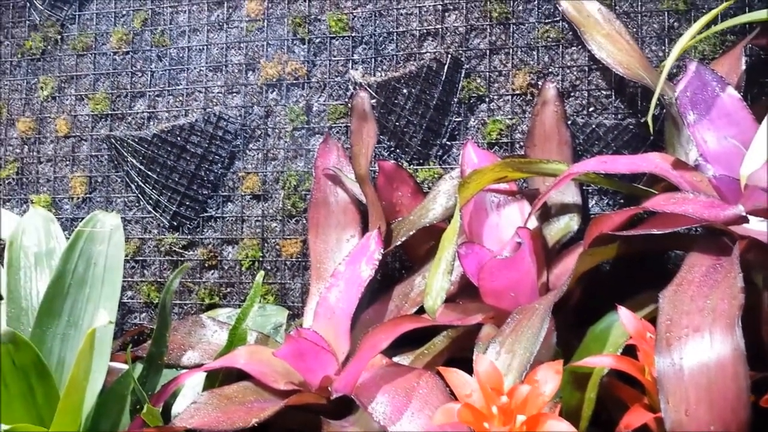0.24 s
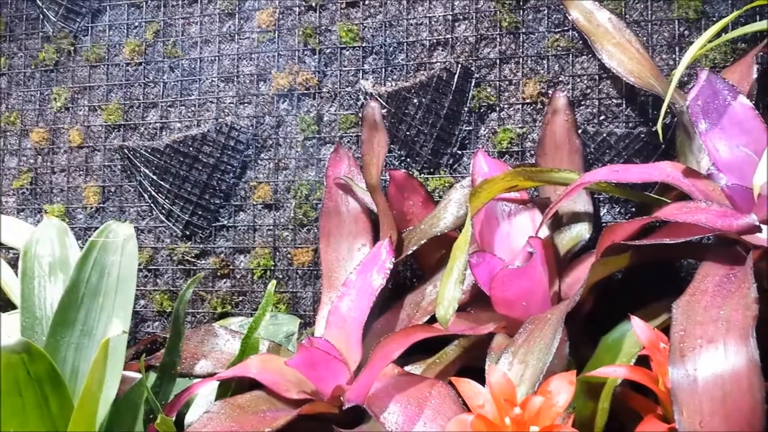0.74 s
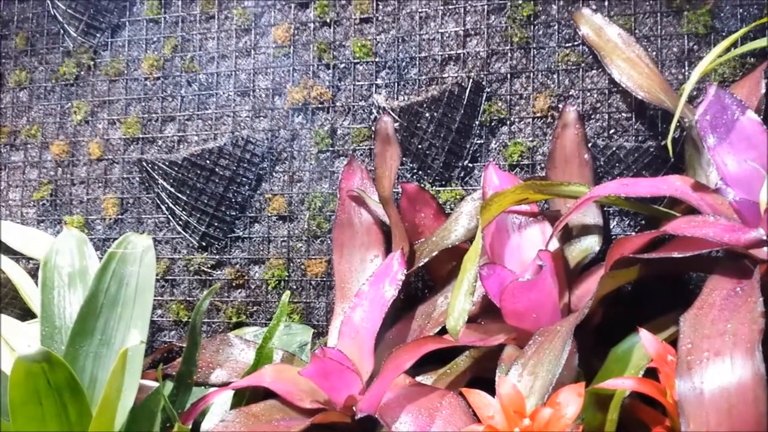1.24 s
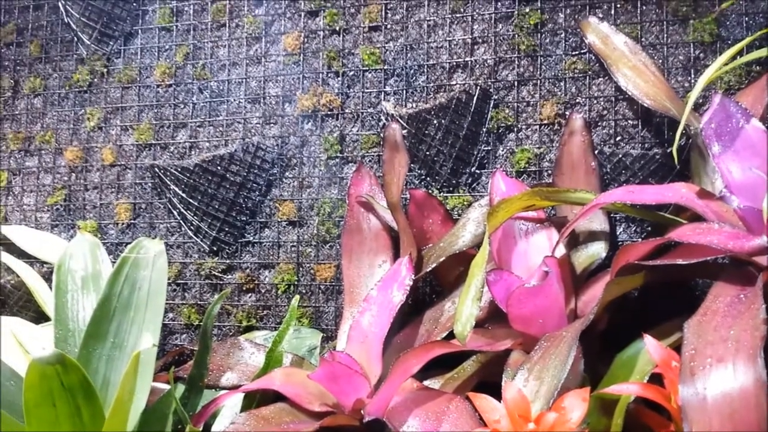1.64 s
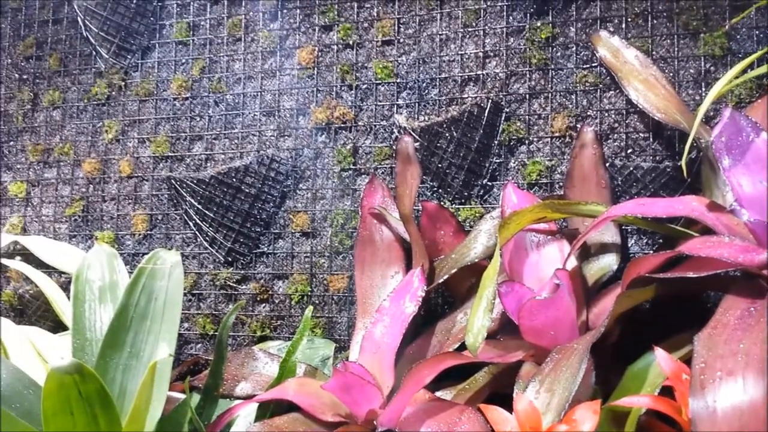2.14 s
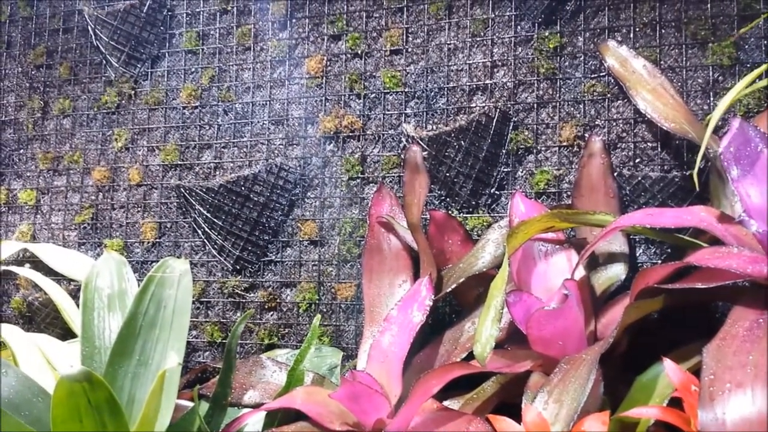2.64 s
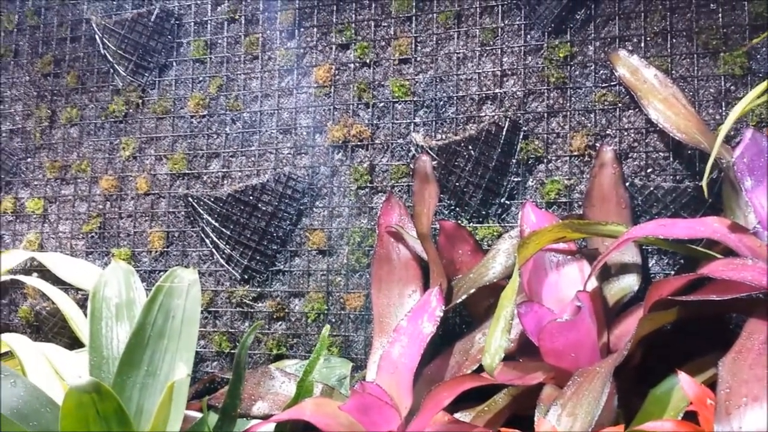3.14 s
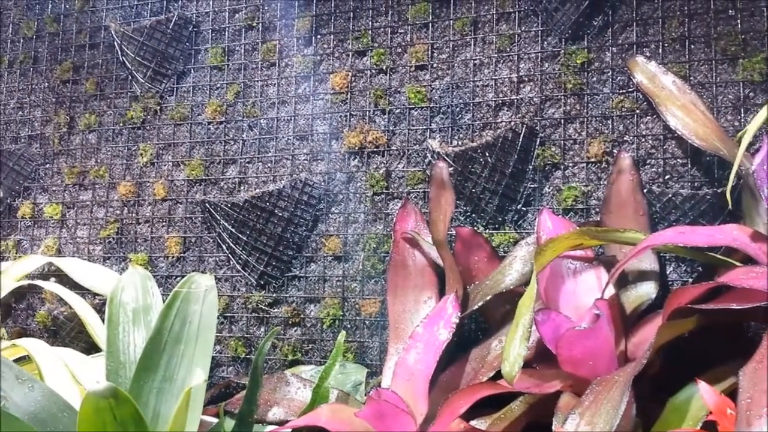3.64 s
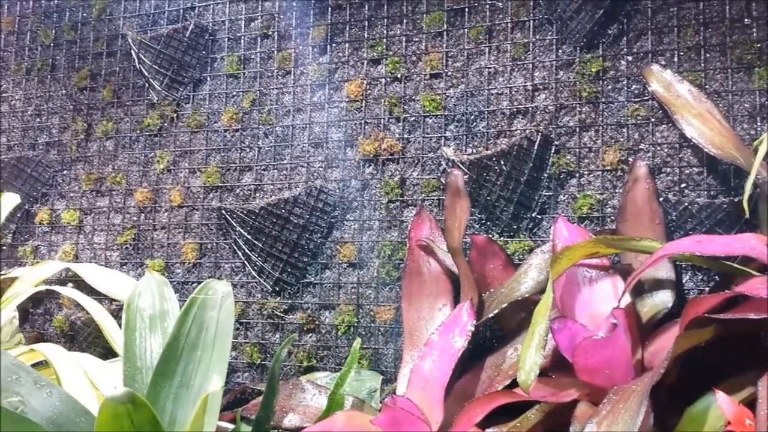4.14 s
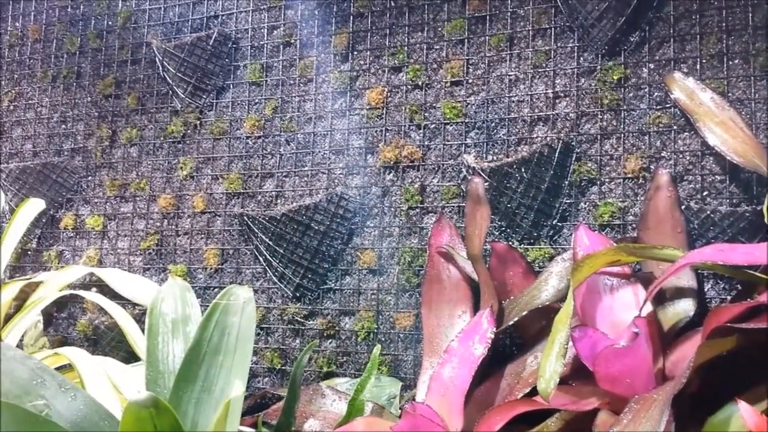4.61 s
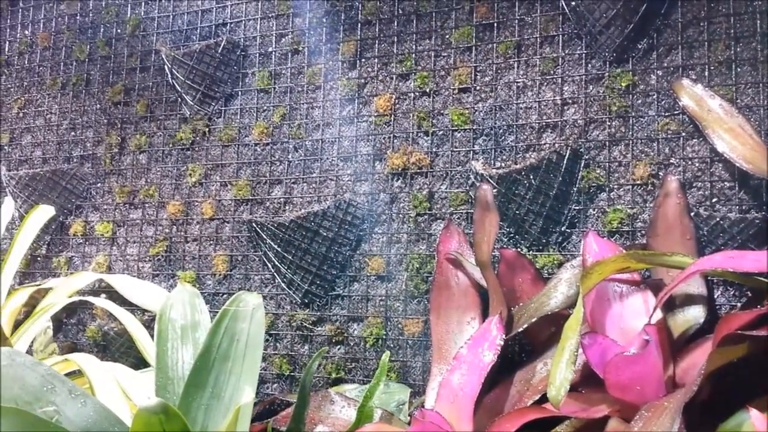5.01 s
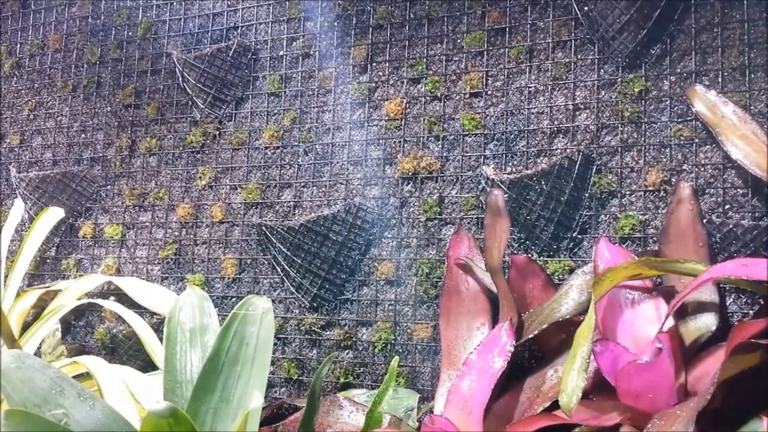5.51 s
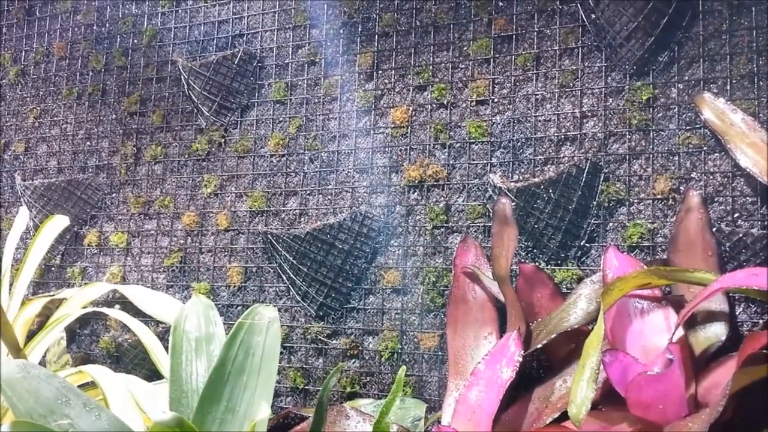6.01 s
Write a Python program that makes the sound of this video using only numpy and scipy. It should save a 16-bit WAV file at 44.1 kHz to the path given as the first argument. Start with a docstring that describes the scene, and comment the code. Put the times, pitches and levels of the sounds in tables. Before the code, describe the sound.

Continuous fine water spray, a wide stereo hiss with barely perceptible flutter, dominates from start to end. Quieter below are a deep steady machine hum, leaning slightly left, and a soft airy breath of ventilation that gently comes and goes. A faint piercing whine wavers separately left and right. Close indoor hand-held pickup, no distinct events.

```python
"""Misting nozzles hiss steadily over a plant wall indoors, heard by a hand-held pair of microphones:
noise coloured per port, with faint drifting patches and a treble flutter.
A thin electrical whine, one sine, swells and fades in each ear as the microphones drift through
its standing waves. A pump and fans hum below: mains tones, shaft tones, a rumble that the room
colours, and a soft airy band of noise that comes and goes."""
import sys
import numpy as np
from scipy import signal
from scipy.fft import rfft, irfft
from scipy.io import wavfile
from scipy.ndimage import uniform_filter1d

SR = 44100
rng = np.random.default_rng(int(sys.argv[2]) if len(sys.argv) > 2 else 0)


def convert_level_to_amplitude(level_db):
    """Map a level in decibels to its linear amplitude factor."""
    exponent = np.asarray(level_db, float) / 20
    return 10 ** exponent


def file_out(sig):
    """Save sig as 16-bit WAV at sys.argv[1]."""
    # one column per channel
    cols = np.atleast_2d(sig).T
    # limit, then scale
    lim = np.clip(cols, -1, 1)
    pcm = np.round(lim * 32767).astype(np.int16)
    wavfile.write(sys.argv[1], SR, pcm)


N = 276058


def evened(x):
    """Scales to rms 1."""
    return x / np.sqrt(np.mean(x ** 2) + 1e-20)


def read(points, hz):
    """Interpolates a table on a log-frequency axis."""
    point_hz, value = np.transpose(points)
    return np.interp(np.log(hz + 1), np.log(point_hz + 1), value)


def wander(top_hz, count):
    """Slow random drift, Gaussian low-pass, overall rms 1; count rows."""
    spectrum = rfft(rng.standard_normal((count, N)))
    spectrum *= np.exp(-(np.fft.rfftfreq(N, 1 / SR) / top_hz) ** 2)
    return evened(irfft(spectrum, N))


# Left-right correlation of the sound field: (frequency [Hz], correlation [-1..1])
LIKENESS = [(60, 0.81), (92, 0.88), (140, 0.86), (210, 0.87), (330, 0.76), (500, 0.48), (770, 0.42),
            (1170, 0.077), (1790, -0.25), (2740, -0.035), (4190, -0.031), (6410, 0.026), (9810, -0.062),
            (15000, 0.0077)]


def paired(z, hz):
    """Mixes four real random arrays into two complex spectra, correlated as the sound field is."""
    same = np.clip(read(LIKENESS, hz), -1, 1)
    same = same.reshape((-1,) + (1,) * (z.ndim - 2))
    left = z[0] + 1j * z[1]
    other = z[2] + 1j * z[3]
    right = same * left + np.sqrt(1 - same ** 2) * other
    return np.array([left, right])


# Broad machine rumble, before the lean: (frequency [Hz], density [dB per Hz])
RUMBLE_DENSITY = [(10, -91), (35, -86), (50, -74), (100, -75), (165, -79.5), (230, -78.5), (330, -82.5),
                  (450, -87), (700, -110)]
# Fuzzy bands added to it, before the lean: (centre [Hz], width [Hz], level [dB rms])
RUMBLE_BANDS = [(57.5, 3.9, -62), (85, 14, -68), (146.5, 6.6, -57), (198, 11, -65.5), (251, 12, -66),
                (295.4, 7.6, -64.5)]


def rumble():
    """Air and casing noise of the machines, with narrow bands where ducts and room ring."""
    hz = np.fft.rfftfreq(N, 1 / SR)
    power = convert_level_to_amplitude(read(RUMBLE_DENSITY, hz)) ** 2
    for centre_hz, width_hz, db in RUMBLE_BANDS:
        bell = np.exp(-2 * ((hz - centre_hz) / width_hz) ** 2)
        bell_area_hz = width_hz * np.sqrt(np.pi / 2)
        power = power + convert_level_to_amplitude(db) ** 2 * bell / bell_area_hz
    z = paired(rng.standard_normal((4, len(hz))), hz)
    return irfft(z * np.sqrt(power * N * SR / 4), N)


# Soft airy band, before the lean: (time [s], level [dB rms])
MOAN_LEVEL = [(0, -61), (1.4, -65), (1.85, -59), (2.9, -68), (3.5, -62), (3.8, -64.5), (5.2, -59),
              (6.26, -61.5)]


def moan(centre_hz=788.5, half_width_hz=47):
    """Noise in one broad resonance, swelling slowly."""
    hz = np.fft.rfftfreq(N, 1 / SR)
    z = paired(rng.standard_normal((4, len(hz))), hz)
    shape = np.exp(-((hz - centre_hz) / half_width_hz) ** 4)
    band = evened(irfft(z * shape, N))
    level_db = np.interp(np.arange(N) / SR, *np.transpose(MOAN_LEVEL))
    return band * convert_level_to_amplitude(level_db)


# Mains hum near 120, 240 and 840 Hz, shaft tones at the rest; before waver and lean:
# (frequency [Hz], level [dB rms])
HUM_TONES = [(18.4, -72), (59.3, -61), (62, -63), (91.1, -67), (120, -53.3), (183.2, -65), (207, -65),
             (211.1, -65), (240, -59), (294, -69), (840.1, -76)]


def tones(waver_db=1.0, slip_rad=0.11):
    """Steady sines whose level and phase waver a little."""
    hz, db = np.transpose(HUM_TONES)[:, :, None]
    turns = hz * np.arange(N) / SR + rng.random((len(hz), 1))
    drift = wander(1.8, count=2 * len(HUM_TONES))
    phase = 2 * np.pi * turns + slip_rad * drift[::2]
    level = convert_level_to_amplitude(db + waver_db * drift[1::2])
    return np.sqrt(2) * (level * np.sin(phase)).sum(axis=0)


# Whine in each ear as the microphones drift: (time [s], left level [dB rms], right level [dB rms])
WHINE_LEVELS = [(0, -61, -53), (.45, -58, -53), (.8, -60, -63), (1.25, -71, -70), (1.8, -57, -58),
                (2.4, -60, -60.5), (3.1, -59, -63), (3.55, -66, -59), (4.15, -64.5, -52), (5.0, -59.5, -64),
                (5.5, -62, -59), (6.1, -75, -52)]


def whine(pitch_hz=10239.5, slip_rad=0.3):
    """One high sine; each ear gets its own level and slowly slipping phase."""
    t = np.arange(N) / SR
    time_s, *levels_db = np.transpose(WHINE_LEVELS)
    level = convert_level_to_amplitude([np.interp(t, time_s, db) for db in levels_db])
    phase = 2 * np.pi * pitch_hz * t + slip_rad * wander(0.87, count=2)
    return np.sqrt(2) * level * np.sin(phase)


# Spray at each port, before resonance, low edge and fluctuation: (frequency [Hz], density [dB per Hz])
LEFT_COLOUR = [(570, -84.5), (800, -82.5), (1000, -85), (1300, -77), (1600, -82), (1900, -76),
               (2700, -83.5), (3900, -79.5), (5600, -77.5), (7500, -79), (8300, -84), (11000, -85),
               (13300, -87), (14400, -90.5)]
RIGHT_COLOUR = [(350, -79.5), (570, -86.5), (780, -83), (1000, -85.5), (1300, -81.5), (2700, -82.5),
                (4300, -80.5), (5800, -81), (8600, -79.5), (9400, -80.5), (11000, -82), (12000, -83),
                (12600, -81.5), (14400, -82.5)]
# Microphone port resonance, left row then right: (centre [Hz], width [Hz], boost [dB])
PORT_RESONANCES = [(6580, 1070, 10), (7500, 1440, 8.5)]


def spray(patchy_db=0.48, flutter_db=0.3, low_edge_hz=300):
    """Jet turbulence: smooth noise with faint drifting patches and a flutter shared by the treble."""
    frames, hz = N // 256 + 5, np.fft.rfftfreq(1024, 1 / SR)
    z = rng.standard_normal((frames, 513, 6)).T  # 4 layers for the noise, 2 for the patches
    patches = uniform_filter1d(z[4:], size=30, axis=1)
    patches = evened(uniform_filter1d(patches, size=24, axis=2))
    flutter = evened(uniform_filter1d(rng.standard_normal(frames), size=5))
    treble = np.clip(hz / 6000, 0, 1)[:, None]

    colour_db = np.array([read(LEFT_COLOUR, hz), read(RIGHT_COLOUR, hz)])
    boost_db = [db / (1 + (2 * (hz - port_hz) / width_hz) ** 2)
                for port_hz, width_hz, db in PORT_RESONANCES]
    colour_db = (colour_db + boost_db)[:, :, None]
    field = convert_level_to_amplitude(colour_db + patchy_db * patches + flutter_db * treble * flutter)
    field *= 1 / (1 + (low_edge_hz / (hz[:, None] + 1)) ** 4)

    white = paired(z, hz)
    unit = np.std(signal.istft(white[0], nperseg=1024, noverlap=768)[1])
    noise = signal.istft(white * field, nperseg=1024, noverlap=768)[1][:, :N]
    return noise * np.sqrt(SR / 2) / unit  # per-Hz density to full band


def scene(hum_lean_db=1.5):
    """Spray and whine over the machine hum, which leans left by hum_lean_db."""
    lean = convert_level_to_amplitude([[hum_lean_db / 2], [-hum_lean_db / 2]])
    hum = (rumble() + moan() + tones()) * lean
    return spray() + hum + whine()


def band_limit(x):
    """A steep low-pass at the top of the band."""
    return signal.sosfilt(signal.butter(12, 14510, fs=SR, output="sos"), x)


def record(dry):
    """Subtracts the small constant offset of the converter."""
    mix = dry - .0004
    return band_limit(mix)


dry = scene()
out = record(dry)
file_out(out)
```